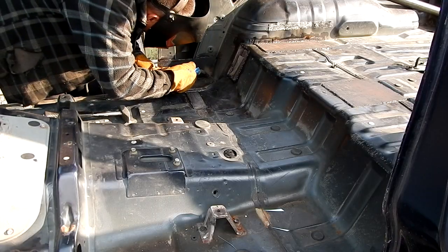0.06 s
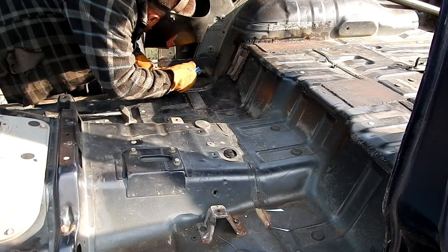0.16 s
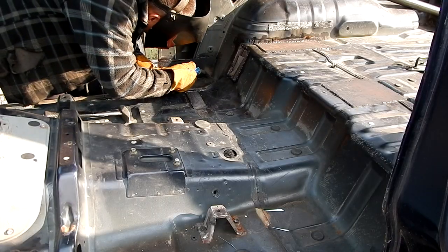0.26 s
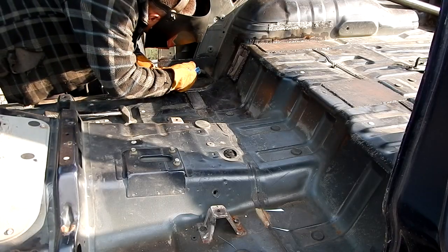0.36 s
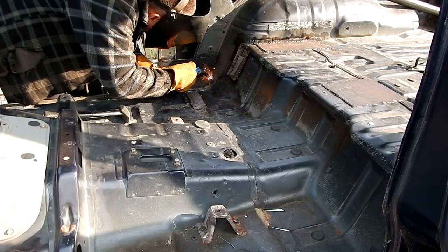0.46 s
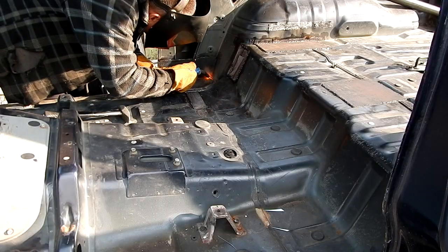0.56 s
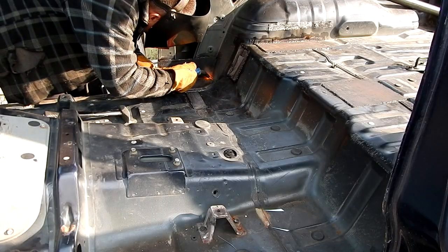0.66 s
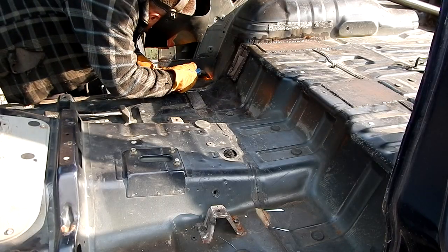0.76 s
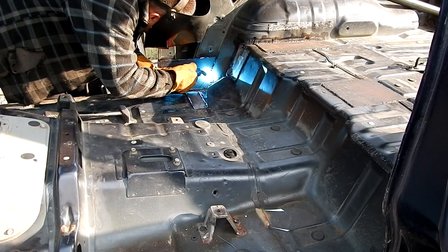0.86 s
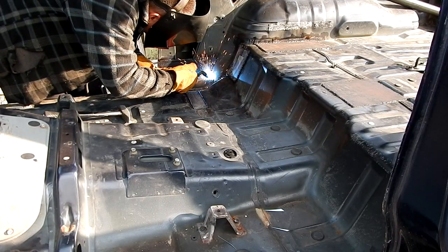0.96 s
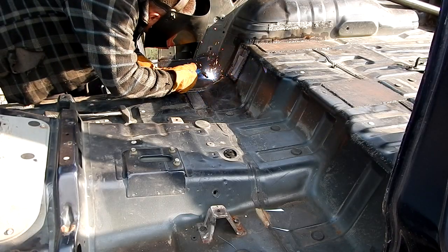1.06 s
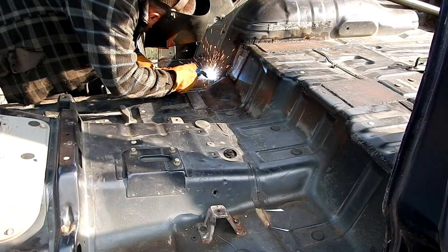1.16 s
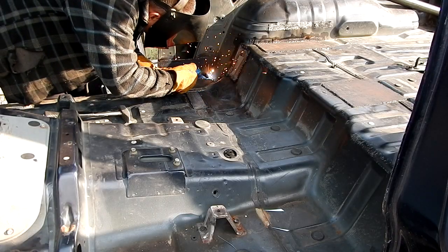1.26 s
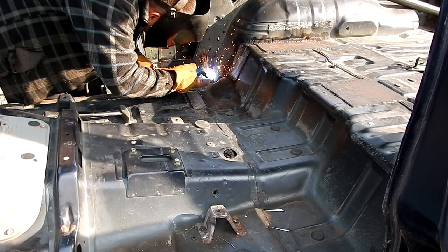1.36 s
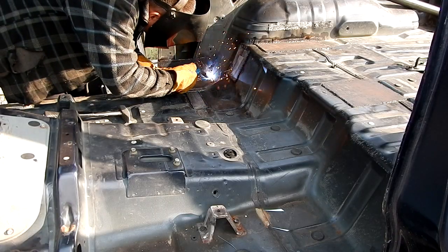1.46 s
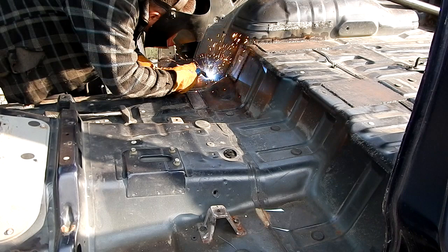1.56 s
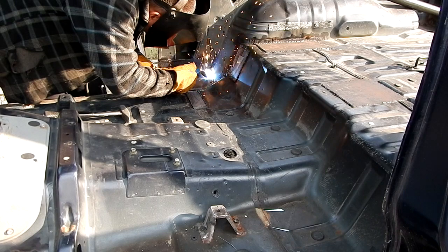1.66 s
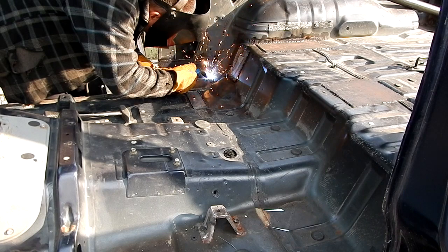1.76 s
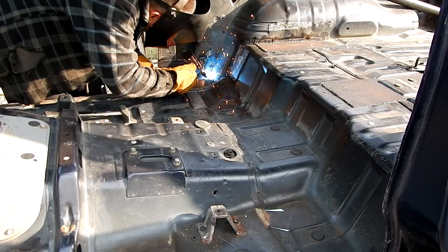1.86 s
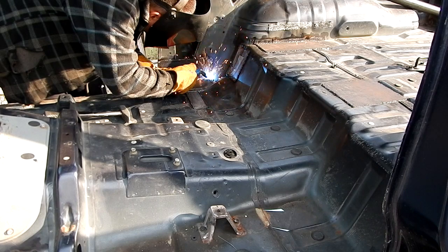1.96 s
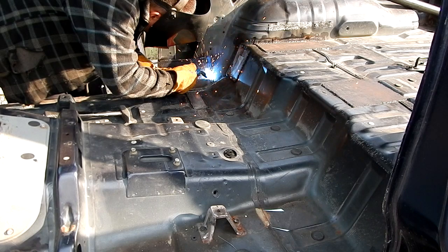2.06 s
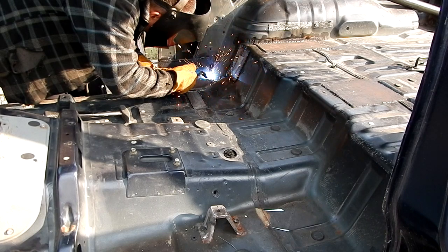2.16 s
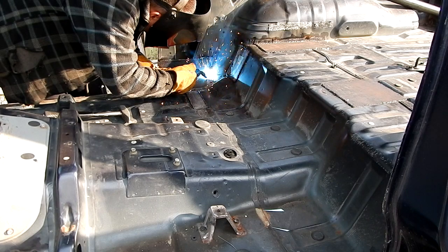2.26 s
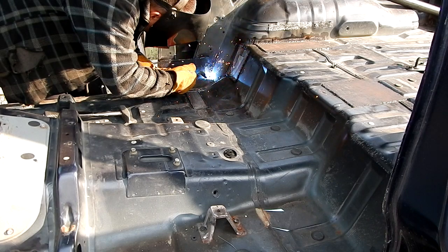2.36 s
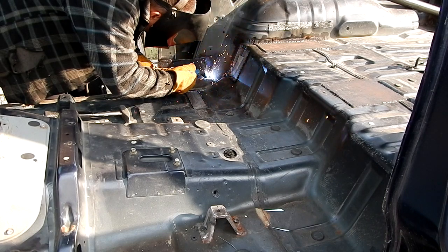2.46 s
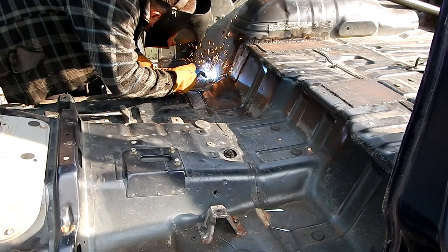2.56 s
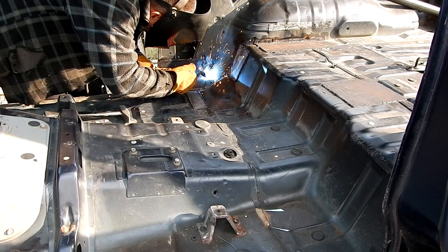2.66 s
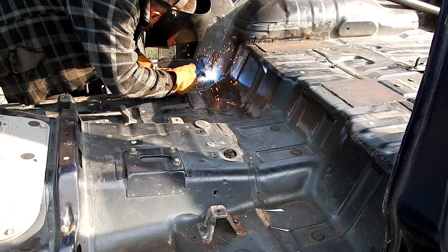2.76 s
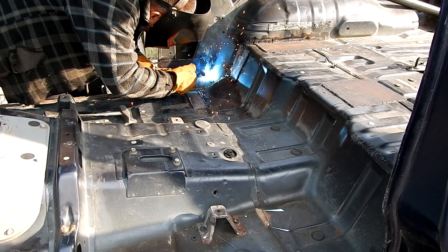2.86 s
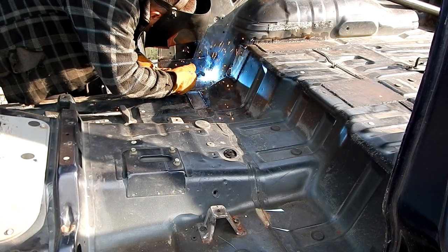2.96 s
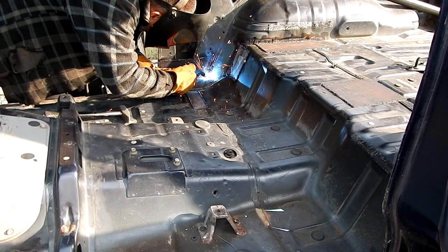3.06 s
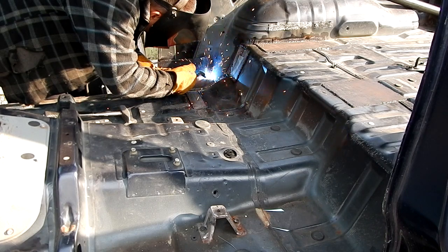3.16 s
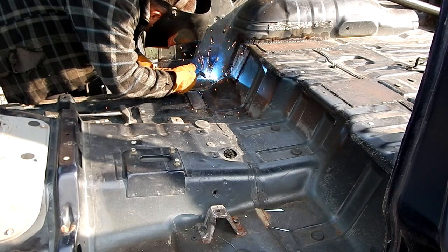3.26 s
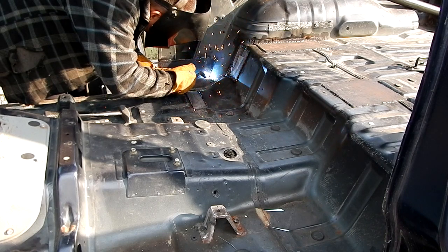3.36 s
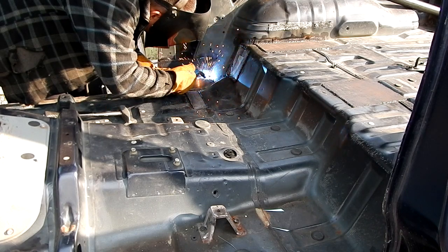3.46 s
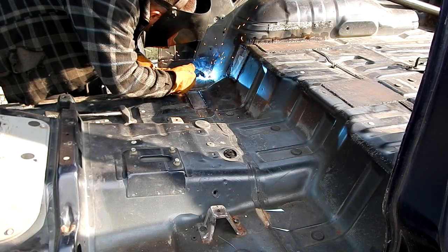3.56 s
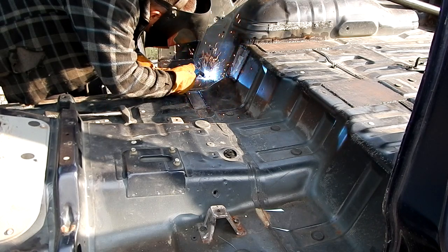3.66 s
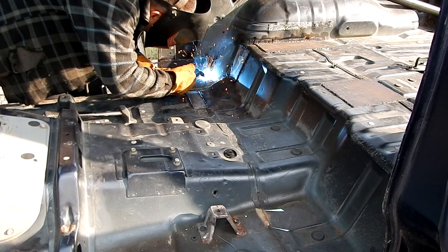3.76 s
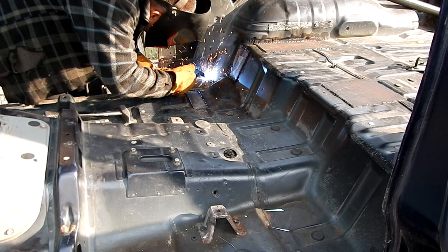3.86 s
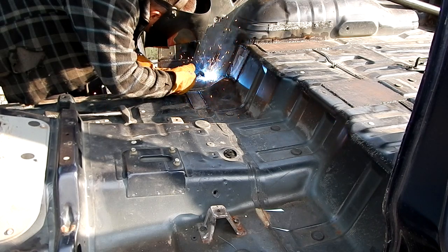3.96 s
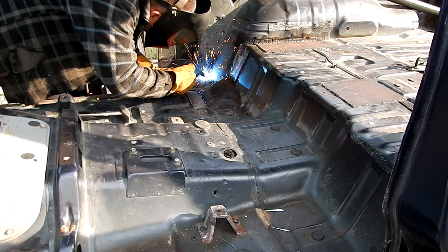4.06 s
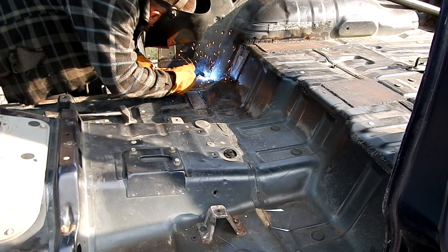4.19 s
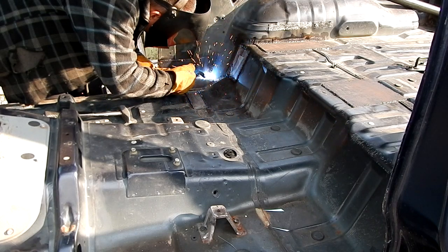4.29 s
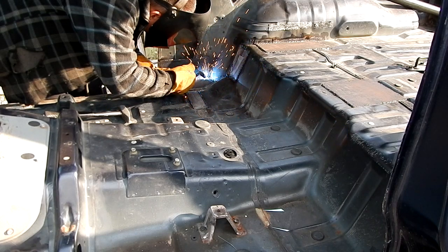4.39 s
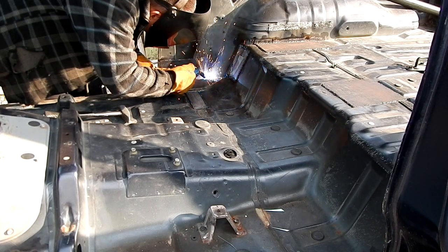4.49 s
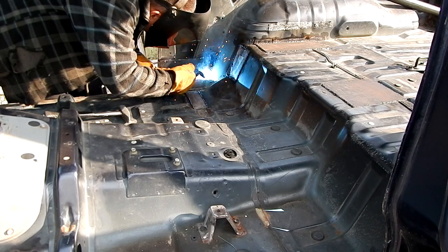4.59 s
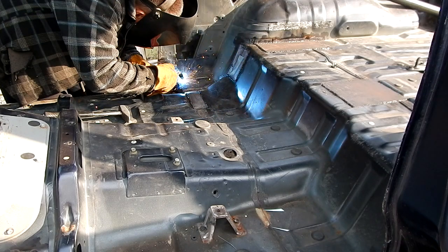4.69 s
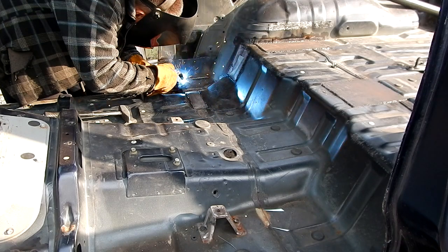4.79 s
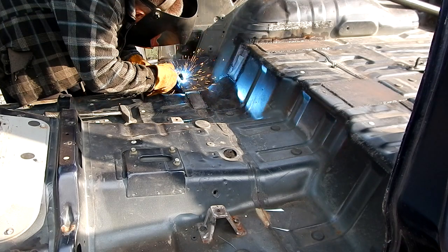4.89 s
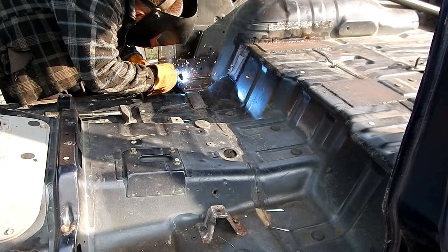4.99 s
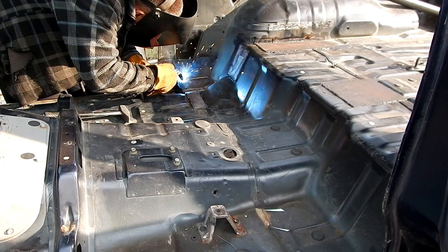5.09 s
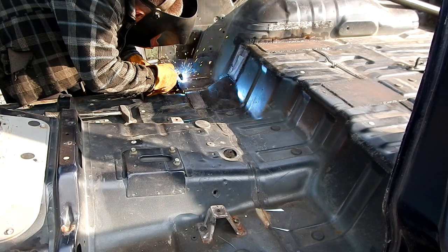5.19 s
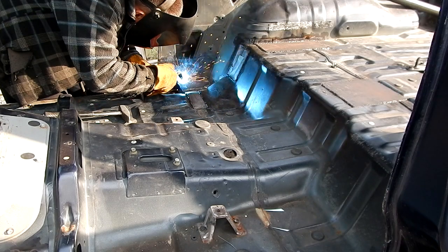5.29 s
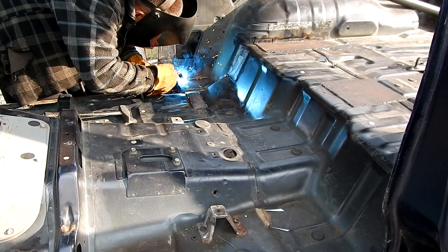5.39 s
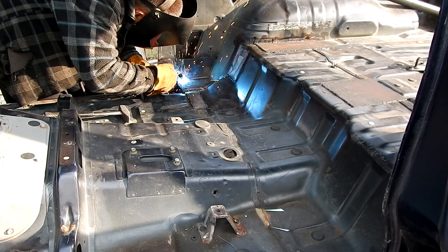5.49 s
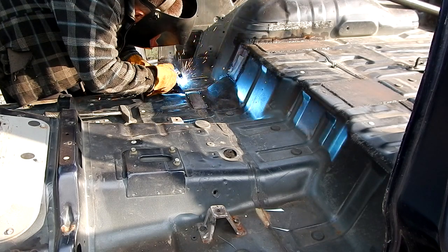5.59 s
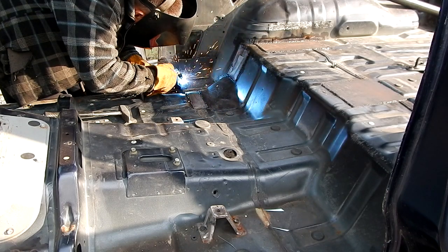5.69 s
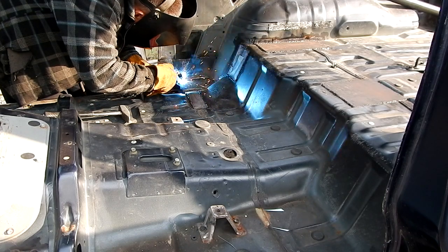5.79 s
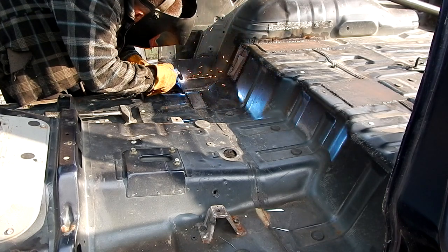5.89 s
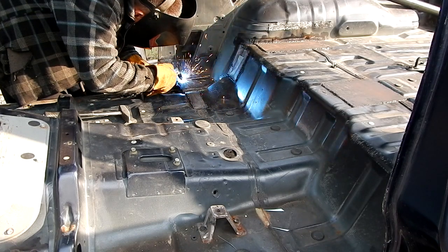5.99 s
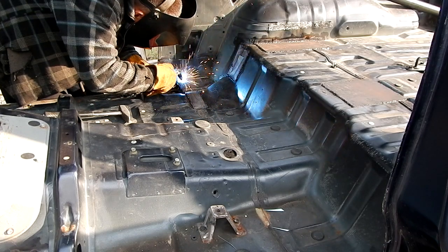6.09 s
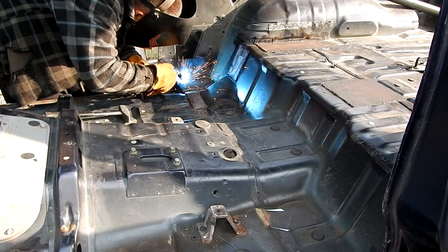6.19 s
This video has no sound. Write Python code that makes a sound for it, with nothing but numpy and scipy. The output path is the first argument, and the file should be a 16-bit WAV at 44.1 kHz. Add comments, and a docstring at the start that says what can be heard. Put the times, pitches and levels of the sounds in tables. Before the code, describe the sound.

Inside a stripped vehicle shell, a wire-feed welder works on the steel floor a couple of metres from the microphone. Soft low thuds and a gritty scrape come first, then a sharp click and a short rush of gas. The arc starts with a stutter and settles into a dense, bright, frying crackle, each pop ringing briefly off the metal walls. It grows a little patchier near the end.

```python
"""Inside a bare vehicle body in a workshop, a wire-feed welder tacks steel into the floor two metres away.
Over the room air the floor panel knocks and rumbles under the welder's weight. A glove scrapes, the gas
valve snaps open and gas hisses. Then the wire shorts out again and again in a crackle of sharp pops, each
echoed alike by the ringing sheet-metal walls; at 4.7 s the torch is at a new spot and the echoes change."""
import sys
import numpy as np
from scipy import signal
from scipy.fft import rfft, irfft
from scipy.io import wavfile
from scipy.ndimage import uniform_filter1d

SR = 44100
rng = np.random.default_rng(int(sys.argv[2]) if len(sys.argv) > 2 else 0)


def put_to_file(sound):
    """Save the sound as 16-bit audio at rate SR, in the file named by the first command-line argument."""
    columns = np.atleast_2d(sound).T  # one column per channel
    safe = np.clip(columns, -1, 1)
    whole_steps = np.round(safe * 32767)
    wavfile.write(sys.argv[1], SR, whole_steps.astype(np.int16))


N = 275184
TIME = np.arange(N) / SR
TAIL = TIME[:SR // 4]  # time axis of echoes and ring-outs


def undb(db):
    return 10 ** (np.asarray(db) / 20)


def curve(rows):
    """A (t/s, value) envelope read at every sample."""
    return np.interp(TIME, *np.transpose(rows))


def response(points, size=4096):
    """Minimum-phase impulse response of an (f/Hz, level/dB) EQ curve; peak 1."""
    hz, db = np.transpose(points)
    bin_db = np.interp(np.log(np.fft.rfftfreq(size, 1 / SR) + 1), np.log(hz), db)
    cepstrum = irfft(bin_db * np.log(10) / 20)
    cepstrum[1:size // 2] *= 2
    cepstrum[size // 2 + 1:] = 0
    h = irfft(np.exp(rfft(cepstrum)))[:size // 2]
    return h / np.abs(h).max()


def through(x, h):
    """Convolution, cut to the scene's length."""
    return signal.fftconvolve(np.atleast_2d(x), np.atleast_2d(h), axes=1)[:, :N]


def noise(colour, db):
    """Wide stereo noise of a given colour and rms level."""
    x = through(rng.standard_normal((2, N)), response(colour))
    return x * undb(db) / x.std()


def train(s, db):
    """Impulses at the given times and levels."""
    return np.bincount((np.asarray(s) * SR).astype(int), undb(db), N)[:N]


def butter(x, hz, kind, order=2, zero_phase=False):
    run = signal.sosfiltfilt if zero_phase else signal.sosfilt
    return run(signal.butter(order, hz, kind, fs=SR, output="sos"), x)


def decay(t60):
    return np.exp(-np.log(1000) * TAIL / t60)


def ring(modes, max_t60=np.inf):
    """Struck metal: a sum of decaying sines; peak 1."""
    h = sum(undb(db) * np.sin(2 * np.pi * hz * TAIL) * decay(min(t60, max_t60)) for hz, db, t60 in modes)
    return h / np.abs(h).max()


AIR_COLOUR = [(300, -5), (600, 0.5), (2000, -4), (4000, -8.5), (4750, 1.5), (5300, -13), (5900, -4.5),
              (7500, -25), (8600, -7), (9300, -22), (14000, -37)]  # room tone EQ: f/Hz, level/dB
AIR_FADER = [(0, -56.5), (.5, -58), (.54, -61), (6.24, -56.5)]  # its level ride: t/s, level/dB
def room_tone():
    """A quiet bed of workshop air and microphone hiss."""
    return noise(AIR_COLOUR, curve(AIR_FADER))


RUMBLE_COLOUR = [(15, -30), (35, -22), (60, -6), (170, -8), (320, -8), (450, -17.5), (900, -75)]  # low end of the body shell: f/Hz, level/dB
RUMBLE_FADER = [(0, -64), (.05, -61), (.2, -52), (.3, -56), (.45, -55.5), (.6, -71), (.9, -66), (1.2, -70),
                (3, -71), (6.24, -70)]  # its ride before the flutter: t/s, level/dB
def body_rumble():
    """The shell rumbles unevenly as weight shifts on it."""
    flutter_db = 176.8 * uniform_filter1d(rng.standard_normal(N), size=2000)  # about 4 dB rms
    return noise(RUMBLE_COLOUR, curve(RUMBLE_FADER)) * undb(flutter_db)


PANEL_MODES = [(153, -7, 0.17), (249, -2.5, 0.16), (340.7, 2.5, 0.2), (540, -9, 0.084), (786, -17, 0.052)]  # floor panel resonances: f/Hz, level/dB, t60/s
PANEL_HITS = [(.003, -47), (.051, -36), (0.061, -32.5), (0.093, -39.5), (.106, -33.5), (.136, -35),
              (0.183, -40), (.21, -44), (0.473, -42)]  # knocks on the panel: t/s, level/dB
def floor_knocks():
    """The floor panel groans under the welder: each knock rings its low modes."""
    return through(train(*np.transpose(PANEL_HITS)), ring(PANEL_MODES))


GAS_COLOUR = [(300, -18), (900, -32), (1300, -4), (1600, 0.5), (1800, -3), (2000, -12), (2250, -5),
              (3000, -15), (3700, -28), (4400, -2.5), (5700, -6.5), (7500, -26), (8600, -46), (11000, -50),
              (14000, -67)]  # shielding gas EQ: f/Hz, level/dB
GAS_FADER = [(.5, -89), (.53, -51), (.7, -52), (.9, -48), (1.2, -75), (6.24, -76)]  # its level ride: t/s, level/dB
def gas_hiss():
    """Shielding gas rushes through the open valve, then sinks to a faint hiss."""
    return noise(GAS_COLOUR, curve(GAS_FADER))


GRIT_CUES = [(.012, 0.027, -54), (0.037, 0.066, -46), (0.476, 0.013, -39), (0.483, .01, -34.5),
             (0.489, 0.033, -39), (1.083, 0.0086, -39), (1.164, .006, -42), (2.896, .02, -55),
             (5.797, 0.0071, -47)]  # short gritty bursts: t/s, length/s, level/dB
def grit_bursts():
    """Short swells of gritty noise: glove and trigger scrapes, then a few faint pops in the arc's pauses."""
    swell = sum(undb(db) * np.sin(np.pi * np.clip((TIME - s) / length, 0, 1) ** 0.68)
                for s, length, db in GRIT_CUES)
    grit = undb(18 * uniform_filter1d(rng.standard_normal(N), size=40))
    colour = [(300, -16.5), (1600, 7), (2800, -4), (5500, 1.5), (7600, -8), (8700, -8), (14000, -46)]
    return swell * grit * noise(colour, 0)


def walls(paths, scatter_db, t60, onset_s, lean=0.26, spread=0.42):
    """Stereo reverb of the body: distinct paths, then dense scatter that builds and dies away."""
    ms, *gains = np.transpose(paths)
    hz = np.fft.rfftfreq(TAIL.size, 1 / SR)
    delays = np.exp(-2j * np.pi * np.outer(ms / 1000, hz))
    early = irfft(np.array(gains) @ delays, TAIL.size)
    build = 1 - np.exp(-(TAIL / onset_s) ** 2)
    late = rng.standard_normal((2, TAIL.size)) * decay(t60) * build
    mid, own = signal.lfilter(*signal.iirnotch(7600, 7, SR), late)
    side = lean * mid + spread * own  # the torch is left of centre
    return early + undb(scatter_db) * np.array([mid + side, mid - side])


VALVE_MODES = [(1400, -6, 0.051), (1620, 10, 0.02), (4100, -24, .067), (3900, -19, 0.16), (4220, -10, 0.08),
               (4770, 0, 0.16), (5943, -24, .07), (6880, -11, 0.091), (8520, -5, 0.072)]  # gas valve resonances: f/Hz, level/dB, t60/s before the cap
def valve_snap():
    """The gas valve opens with a crack that echoes off the walls, and rings briefly."""
    snap = train(s=[.5198], db=[-10])
    crack = response([(500, -17), (1600, -2.5), (2800, -11.5), (4500, 7.5), (8500, -14.5),
                      (11500, -20.5), (14000, -32)])
    reverb = walls([(0.00039, 1, .8)], scatter_db=-21, t60=.1, onset_s=0.00085)
    ringing = through(snap, ring(VALVE_MODES, max_t60=.07))
    return through(through(snap, crack), reverb) + undb(-6) * ringing


def ribs(level_db, left_db, alike, count=44, from_ms=0.579, to_ms=19, fade_db_per_ms=1.46):
    """Weak echoes off ribs and edges, thinning with delay: rows of delay/ms, left gain, right gain."""
    ms = from_ms + (to_ms - from_ms) * rng.random(count) ** 1.5
    gain = undb(level_db - fade_db_per_ms * ms)
    left, own = rng.standard_normal((count, 2)).T
    right = alike * left + np.sqrt(1 - alike ** 2) * own
    return list(zip(ms, gain * undb(left_db) * left, gain * right))


# sheet-metal resonances: f/Hz, level/dB at the first spot, level/dB at the second, t60/s
SHELL_MODES = [(427, -32.5, -31, 0.043), (710, -37, -31.5, 0.06), (983, -32.5, -36.5, 0.062),
               (1157, -38.5, -36, 0.071), (1356, -35, -35, 0.052), (1743, -41, -53, 0.04),
               (2255, -45.5, -61, 0.12), (3423, -53, -47, 0.2), (3560, -86.5, -32, 0.031),
               (4123, -44.5, -41.5, 0.13), (4295, -39.5, -43, 0.073), (4468, -37, -36, 0.048),
               (4737, -52.5, -32, 0.058), (5584, -51.5, -64, 0.043), (5710, -69.5, -46, 0.053),
               (5890, -32.5, -41, 0.056), (6080, -40, -42, 0.039), (6475, -42.5, -41, .08)]
def shell_ring(spot, left_db=3):
    """The shell rings after a pop at weld spot 0 or 1, louder on the torch's side."""
    ringing = sum(undb(db[spot]) * np.sin(2 * np.pi * hz * TAIL) * decay(t60)
                  for hz, *db, t60 in SHELL_MODES)
    return ringing * undb([[left_db / 2], [-left_db / 2]])


# direct sound and early reflections off torch, floor and walls: delay/ms, left gain, right gain
FIRST_SPOT_PATHS = [(0.0, 1.16, 0.85), (0.181, -0.28, -0.43), (0.249, -0.92, -0.62), (0.317, -0.34, -0.43),
                    (0.397, -0.62, -0.32), (0.522, -0.27, -0.6), (0.692, 0.21, 0.073), (1.61, -0.73, 0.34),
                    (3.084, -0.38, -0.58), (5.079, 0.34, 0.26), (5.329, -0.38, -0.18), (8.356, -0.59, 0.32)]
SECOND_SPOT_PATHS = [(0.0, 1.56, 1), (0.204, -0.0016, -0.59), (0.295, -0.3, 0.0089), (0.363, 0.12, 0.13),
                     (0.442, 0.079, -0.59), (0.51, -0.013, -0.37), (0.85, 1.04, -0.72),
                     (1.859, -0.68, -0.45), (5.249, 0.022, 1), (5.544, -0.88, -0.74), (6.587, -0.28, -0.42),
                     (8.379, -0.44, -0.21)]
def spot_reverbs():
    """Each weld spot has its own pattern of echoes and excites the shell's modes differently."""
    first = walls(FIRST_SPOT_PATHS + ribs(level_db=-17.5, left_db=3, alike=0.68),
                  scatter_db=-24, t60=0.12, onset_s=0.012)
    second = walls(SECOND_SPOT_PATHS + ribs(level_db=-16, left_db=1, alike=0.37),
                   scatter_db=-24.5, t60=0.13, onset_s=0.0061)
    return first + shell_ring(0), second + shell_ring(1)


def thumps(pops, left_db=3):
    """The loudest pops overload the microphone: a low thump grows steeply with pop size, up to a ceiling."""
    s, db = np.transpose(pops)
    thump_db = -51.5 + 1.9 * (np.minimum(db, -10) + 11)
    thump = response([(20, -21), (60, -7.5), (200, 7.5), (350, 3), (700, -16), (3000, -82)])
    return through(train(s, thump_db), thump) * undb([[left_db], [0]])


CRACKLE_FADER = [(.95, -22), (1.5, -24.5), (2, -22), (2.6, -20.5), (3.1, -25.5), (3.3, -22), (3.8, -22),
                 (4.3, -18.5), (4.7, -20), (5.2, -24), (5.45, -39), (5.7, -24), (5.85, -22), (6.24, -27)]  # level ride of the small pops: t/s, level/dB
ARC_STALLS = [(.9, .078, -38), (1.038, .134, -38), (1.283, .04, -25), (1.475, .029, -20), (1.634, .03, -25),
              (1.86, .025, -15), (2.03, .027, -12), (2.4, .032, -15), (2.66, .02, -9), (2.87, .046, -8.5),
              (3.06, .02, -15), (3.186, .035, -12), (3.386, .037, -3), (3.817, .041, -5), (5.41, .028, -12),
              (5.635, .042, -6), (5.78, .032, -10), (5.934, .044, -17), (6.085, .034, -17)]  # the arc stalls and the small pops duck: t/s, length/s, gain/dB
def small_pops(loud_s, cycle_s=.014, evenness=3, spread_db=1.5, clear_s=.007, count=800):
    """Times and levels of the small, uneven short circuits that fill in between the loud ones."""
    s = loud_s[0] + np.cumsum(rng.gamma(evenness, cycle_s / evenness, count))
    db = np.interp(s, *np.transpose(CRACKLE_FADER)) + spread_db * rng.standard_normal(count)
    start, length, stall_db = np.transpose(ARC_STALLS)
    stalled = (s[:, None] > start) & (s[:, None] < start + length)
    db = db + stalled @ stall_db
    taken = np.abs(s[:, None] - loud_s).min(axis=1) < clear_s
    keep = ~taken & (s < TIME[-1])
    return s[keep], db[keep]


LOUD_POPS = [(0.9201, -27), (0.9654, -8.5), (0.9787, -14), (0.9853, -11), (0.9884, -10.5), (0.9927, -14),
             (0.9977, -10.5), (1.02, -18), (1.0254, -13.5), (1.0327, -13.5), (1.0986, -14), (1.175, -10),
             (1.1869, -12), (1.1938, -10), (1.2115, -14.5), (1.2199, -13.5), (1.2214, -19), (1.2273, -14),
             (1.2516, -22), (1.2667, -17), (1.281, -12.5), (1.3238, -25), (1.3283, -17.5), (1.3399, -13.5),
             (1.3576, -19), (1.366, -18), (1.3691, -11), (1.378, -10.5), (1.394, -15.5), (1.4067, -15),
             (1.4162, -13), (1.4318, -14.5), (1.451, -15), (1.473, -14), (1.5052, -17.5), (1.5383, -16.5),
             (1.5626, -14.5), (1.568, -10.5), (1.5815, -13.5), (1.5917, -13.5), (1.6145, -14.5),
             (1.622, -22.5), (1.6327, -20.5), (1.665, -11.5), (1.6845, -22), (1.7036, -13.5), (1.7146, -16),
             (1.7313, -22), (1.7434, -20.5), (1.7662, -18), (1.7827, -15.5), (1.7944, -25), (1.8035, -28),
             (1.8224, -10), (1.8362, -13), (1.8457, -20), (1.8567, -17), (1.8854, -18.5), (1.8997, -17),
             (1.9104, -10), (1.9343, -14), (1.9608, -20), (1.9656, -19.5), (1.9745, -15.5), (1.9867, -18),
             (1.9911, -23), (1.9955, -11), (2.0169, -18), (2.029, -18), (2.058, -15.5), (2.0687, -15),
             (2.08, -18.5), (2.103, -15.5), (2.1168, -17), (2.1277, -16.5), (2.137, -17), (2.1439, -11.5),
             (2.1568, -14), (2.1724, -21), (2.1873, -18), (2.1954, -11), (2.1968, -11), (2.2264, -22),
             (2.257, -15.5), (2.274, -22), (2.2898, -21), (2.309, -15.5), (2.3271, -15.5), (2.334, -15.5),
             (2.349, -18.5), (2.3604, -18.5), (2.381, -17.5), (2.3985, -14.5), (2.4328, -18),
             (2.4523, -8.5), (2.4608, -14), (2.4653, -13), (2.481, -14.5), (2.5067, -20), (2.5332, -14),
             (2.546, -10.5), (2.5572, -17), (2.5837, -19), (2.5939, -11.5), (2.6591, -22), (2.6827, -11),
             (2.7064, -16.5), (2.72, -18), (2.7313, -19), (2.7479, -15.5), (2.758, -19), (2.7715, -22),
             (2.79, -24), (2.7991, -17), (2.8131, -18), (2.8221, -14), (2.8332, -11), (2.8514, -25),
             (2.8678, -24.5), (2.9174, -16), (2.9344, -17.5), (2.941, -15.5), (2.952, -9), (2.99, -19),
             (2.9972, -13.5), (3.03, -23), (3.05, -26), (3.0542, -15.5), (3.0862, -10), (3.1051, -20),
             (3.1246, -22), (3.1321, -22), (3.1464, -21), (3.1566, -14), (3.1664, -16), (3.1746, -14),
             (3.2226, -23), (3.2718, -22), (3.283, -19), (3.292, -24), (3.3129, -14.5), (3.3297, -17.5),
             (3.3684, -19), (3.3896, -22), (3.4273, -24), (3.4342, -16), (3.453, -15.5), (3.4584, -10),
             (3.4854, -12), (3.5313, -15.5), (3.5533, -17.5), (3.5735, -12.5), (3.59, -21.5), (3.617, -22),
             (3.636, -20), (3.647, -16), (3.6795, -18), (3.6967, -16.5), (3.7043, -19.5), (3.713, -21),
             (3.7403, -27), (3.7543, -11), (3.7896, -24), (3.8141, -19.5), (3.8568, -22), (3.8628, -13),
             (3.8939, -24), (3.9089, -23), (3.9163, -23), (3.9363, -16), (3.9461, -16.5), (3.9736, -18.5),
             (3.9844, -20), (4.0122, -20), (4.0168, -15.5), (4.0394, -11.5), (4.0594, -14.5),
             (4.0843, -17.5), (4.109, -14.5), (4.1236, -18), (4.1288, -12), (4.1417, -19), (4.1596, -21),
             (4.173, -16.5), (4.1791, -20), (4.1852, -19), (4.1976, -12), (4.2038, -14.5), (4.2236, -14.5),
             (4.2381, -21), (4.2428, -17), (4.2671, -25), (4.2744, -15.5), (4.2841, -19.5), (4.2905, -26),
             (4.31, -20), (4.3156, -16), (4.321, -13.5), (4.3327, -22), (4.34, -30), (4.3563, -15.5),
             (4.3655, -18), (4.3857, -14), (4.4009, -16), (4.4129, -19), (4.4239, -13.5), (4.4335, -16),
             (4.4593, -21), (4.4658, -15), (4.5021, -17.5), (4.5087, -16), (4.5317, -15.5), (4.538, -16),
             (4.5529, -15.5), (4.5871, -12.5), (4.6053, -14.5), (4.6194, -18), (4.6545, -14.5),
             (4.6783, -16), (4.7075, -26), (4.7328, -23), (4.7848, -16), (4.802, -22), (4.865, -21.5),
             (4.8805, -20.5), (4.8955, -16), (4.963, -17.5), (4.9839, -18), (4.993, -13), (5.0388, -17.5),
             (5.0491, -21.5), (5.0637, -19.5), (5.0732, -25), (5.0987, -27), (5.1175, -11.5),
             (5.1327, -18.5), (5.1499, -12), (5.1689, -14.5), (5.1924, -14), (5.1996, -20), (5.2054, -16),
             (5.2124, -19), (5.2174, -17.5), (5.231, -16.5), (5.2609, -18), (5.2785, -27), (5.2863, -20),
             (5.309, -15), (5.3359, -24.5), (5.353, -14.5), (5.3591, -13.5), (5.3717, -19), (5.3733, -13),
             (5.396, -21), (5.4092, -18), (5.4384, -29), (5.4531, -26), (5.4683, -14), (5.4872, -21),
             (5.492, -11.5), (5.5002, -15.5), (5.5168, -16.5), (5.5463, -26), (5.557, -21), (5.5755, -30),
             (5.6035, -27), (5.6189, -10.5), (5.654, -26), (5.7119, -12.5), (5.747, -20), (5.777, -28.5),
             (5.8126, -12), (5.8577, -20.5), (5.8735, -20), (5.9345, -23), (5.9798, -24.5), (6.0032, -21.5),
             (6.0223, -23), (6.0308, -21), (6.0447, -22.5), (6.0663, -19), (6.0839, -12), (6.1198, -18),
             (6.1215, -11), (6.1495, -17), (6.173, -13.5), (6.1903, -17.5), (6.215, -21.5), (6.2365, -22)]  # the short circuits whose break stands out: t/s, level/dB
POP_COLOUR = [(150, -34.5), (500, -17.5), (800, -21.5), (1000, -12), (2000, -8), (3200, -7), (4400, -0.2),
              (5900, 2), (7500, -7), (8800, -7.5), (10500, -20.5), (13000, -34), (15500, -64)]  # EQ of one pop: f/Hz, level/dB
POP_BODY = [(.93, 17.5), (.96, 0.5), (1.2, 1.5), (1.5, -3.5), (2.5, -1), (3.5, -0.5), (3.9, 3), (4.2, 5),
            (4.69, 3.5), (4.71, -3), (5.2, -2), (5.7, -3.5), (6.24, 0)]  # ride on the pops' band below the crossover: t/s, gain/dB
def arc(move_s=4.702, crossover_hz=2500, sputter_db=-29.5, sputter_lag_s=.012, sputters=450):
    """Each short circuit breaks with a negative-going spike, heard through the echoes of its weld spot."""
    loud_s, loud_db = np.transpose(LOUD_POPS)
    s, db = np.hstack([(loud_s, loud_db), small_pops(loud_s)])
    # the pool keeps spitting for a moment after a loud pop
    spit_s = loud_s[rng.integers(len(loud_s), size=sputters)] + rng.exponential(sputter_lag_s, sputters)
    spit_db = sputter_db + 2.5 * rng.standard_normal(sputters)
    lead = 40  # samples of pre-roll for the zero-phase crossover
    spikes = train(s - lead / SR, db) + train(spit_s, spit_db)
    spark = np.pad(-response(POP_COLOUR), (lead, 0))
    low = butter(spark, crossover_hz, "low", order=1, zero_phase=True)
    body_gain = undb(curve(POP_BODY))
    # the largest pops also have the sharpest top edge
    edge = butter(train(s, 1.12 * db - 12), 12600, "low", order=6)
    edge = butter(edge, 11100, "high", order=4)
    out = 0
    for here, reverb in zip((TIME < move_s, TIME >= move_s), spot_reverbs()):
        pops = through(spikes * here, spark - low) + through(spikes * here * body_gain, low)
        out = out + through(pops + edge * here, reverb)
    return butter(out, 260, "high")


def scene():
    """The weld up front, over handling noises, gas and room tone."""
    weld = arc() + thumps(LOUD_POPS)
    return weld + grit_bursts() + valve_snap() + floor_knocks() + body_rumble() + gas_hiss() + room_tone()


def record(dry, ceiling=.37):
    """Close-set capsules give width only in treble and rumble; peaks round off and the top cuts steeply."""
    mid, side = (dry[0] + dry[1]) / 2, (dry[0] - dry[1]) / 2
    treble = butter(butter(side, 2600, "high"), 3200, "high", order=4, zero_phase=True)
    side = treble + butter(side, 200, "low", order=1) + 0.0064 * side
    out = ceiling * np.tanh(np.array([mid + side, mid - side]) / ceiling)
    for hz, width_hz, depth in ((2520, 153, 1), (5060, 360, 0.72)):  # the recorder's narrow notch filters
        notched = signal.lfilter(*signal.iirnotch(hz, hz / width_hz, SR), out)
        out = out + depth * (notched - out)
    out = butter(out, 13500, "low", order=3)
    return signal.sosfilt(signal.ellip(10, .2, 80, 15560, fs=SR, output="sos"), out)


dry = scene()
out = record(dry)
put_to_file(out)
```